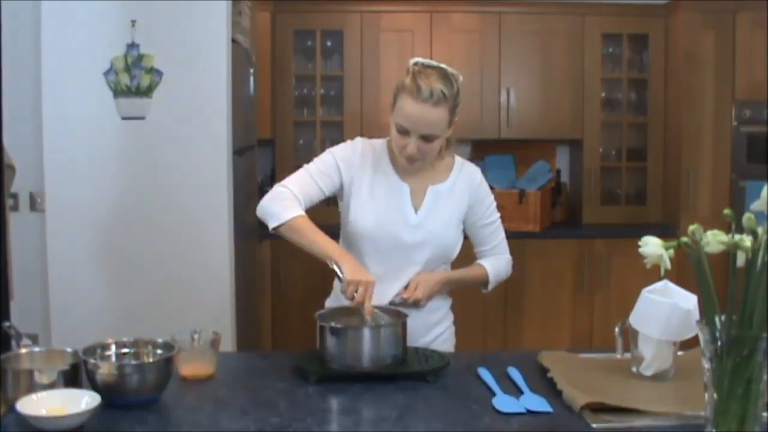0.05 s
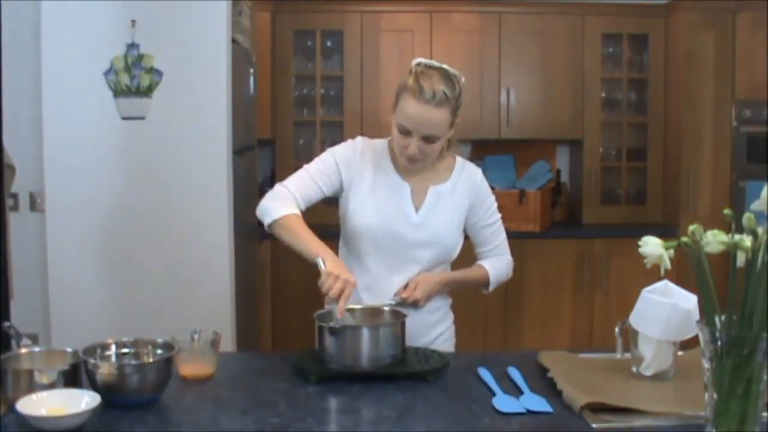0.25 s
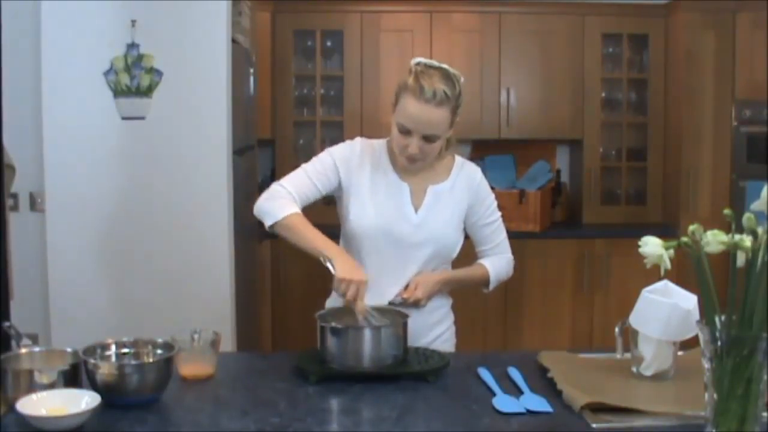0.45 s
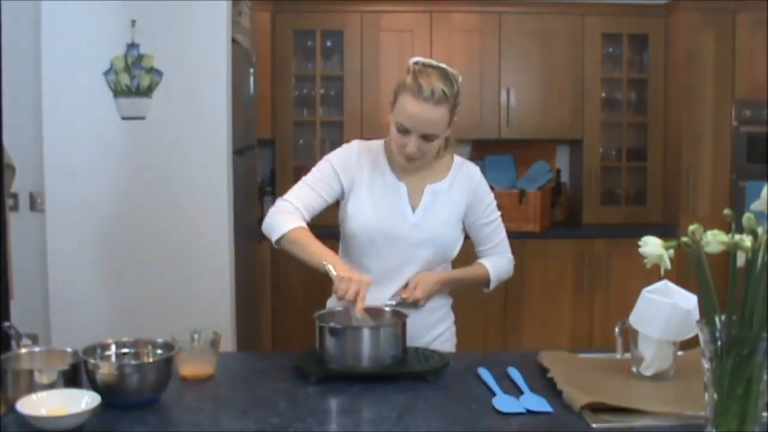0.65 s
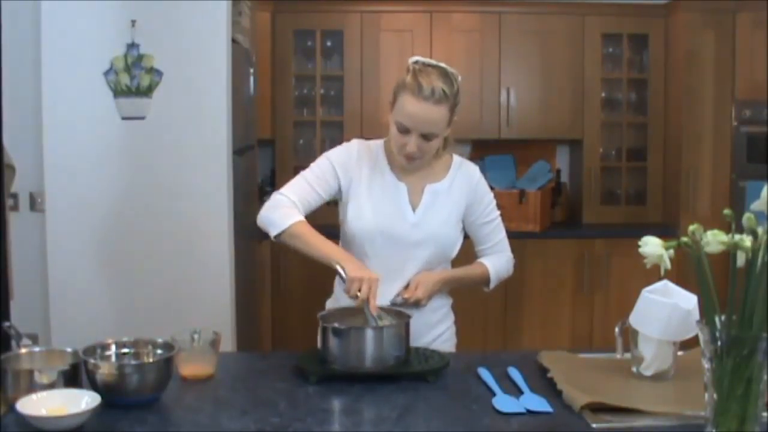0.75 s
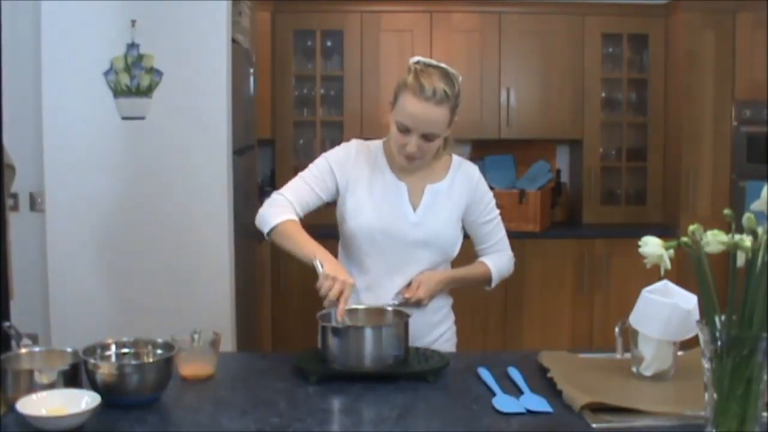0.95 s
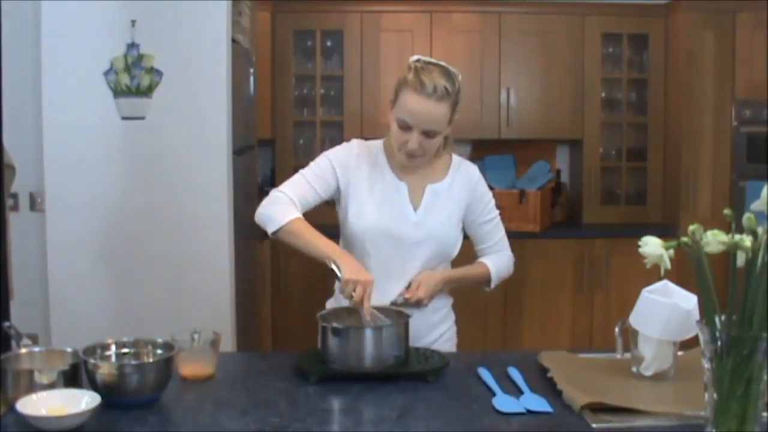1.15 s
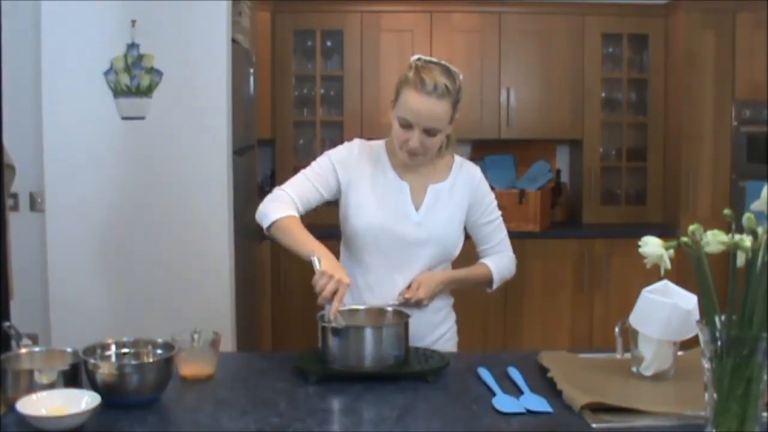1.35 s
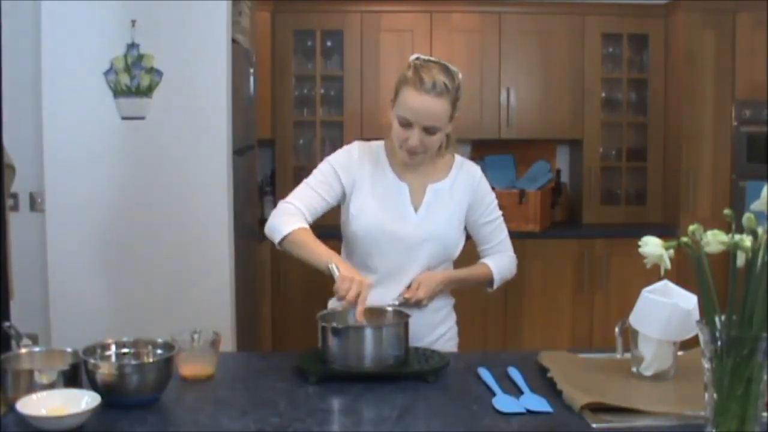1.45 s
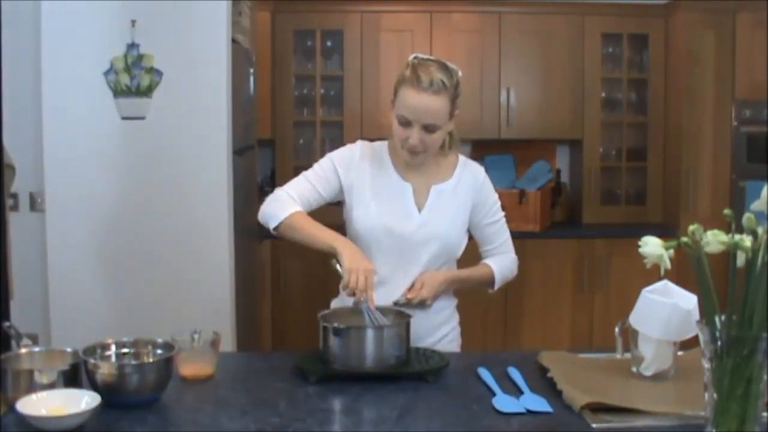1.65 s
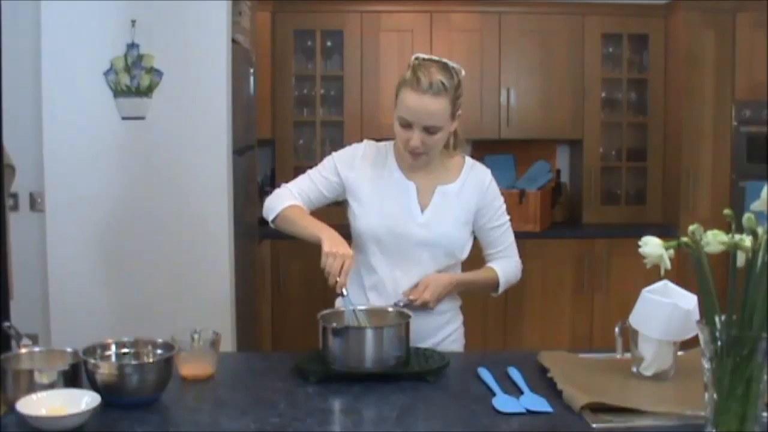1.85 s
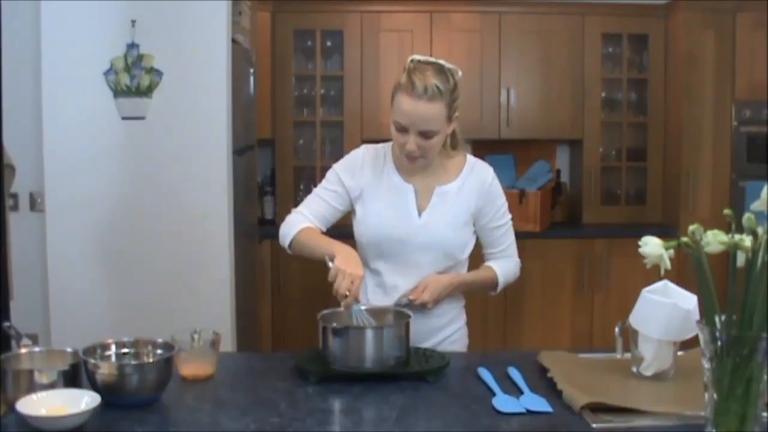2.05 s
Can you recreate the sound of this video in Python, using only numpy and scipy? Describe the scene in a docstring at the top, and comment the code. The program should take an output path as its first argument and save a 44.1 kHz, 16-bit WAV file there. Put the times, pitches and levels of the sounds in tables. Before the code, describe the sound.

A wire whisk beats thick dough in a steel saucepan. Light taps and dull knocks lead to a loud clink at 0.43 s and another at 0.57; after a gap, hits come at 0.85-1.0 and 1.2. A bright rim rattle follows near 1.35, the strongest clank at 1.55, then weaker taps and a brief scrape around 1.75. Short damped rings, roomy kitchen reflections, steady hiss and faint low hum.

```python
"""Kitchen hiss, rumble and a wavering hum; over it a wire whisk beats thick dough in a steel saucepan.
Clinks: quick volleys of wires ring the pan's damped modes, each wire adding a short noise crack.
Swishes: dense treble grains as wires run along the wall. Thuds: low noise bursts, the pan on the hob.
The hard kitchen answers with dense, banded reflections; gain control ducks after loud hits."""
import sys
import numpy as np
from scipy import signal
from scipy.fft import rfft, irfft
from scipy.io import wavfile
from scipy.ndimage import uniform_filter1d

SR = 44100
rng = np.random.default_rng(int(sys.argv[2]) if len(sys.argv) > 2 else 0)


def file_out(sig):
    """Save sig as 16-bit WAV at sys.argv[1]."""
    # one column per channel
    cols = np.atleast_2d(sig).T
    # limit, then scale
    lim = np.clip(cols, -1, 1)
    pcm = np.round(lim * 32767).astype(np.int16)
    wavfile.write(sys.argv[1], SR, pcm)


def boost(x):
    """Linear amplitude factor 10**(x/20) for a level x in decibels (scalar or array-like)."""
    u = np.asarray(x, float) / 20
    return 10 ** u


N = 92610

# kitchen background spectrum, relative: hz, level_db
AIR_SPECTRUM = [(25, -20), (45, -3), (70, -54), (110, -8.5), (180, -8), (300, -5), (450, -11.5), (900, -12),
                (1800, -17), (4000, -17.5), (6000, -27), (10000, -33.5), (15500, -35.5)]
AIR_DB, AIR_SIDE_DB = -32.5, 0.5
HUM_HZ, HUM_WIDTH_HZ, HUM_DB = 101, 36, -40   # appliance hum

# volleys of wires on the pan, relative levels:
# start_s, level_db, length_s, rim_share (0-1), tilt_below_pivot_db_per_octave, tilt_above_pivot_db_per_octave
WIRE_VOLLEYS = [(0.005, -32.5, .04, 0.77, 0.1, 10), (0.216, -10, .008, .3, -4, -9),
                (0.4, -17.5, 0.016, 0.1, 3, 6.5), (0.434, 0.5, 0.015, 0.029, 1, 3),
                (0.5715, -7.5, .006, 0.5, -1, -2), (0.855, -3.5, 0.0078, 0.2, -2.2, 3),
                (0.912, -9.5, 0.029, 0.073, -3.2, -9), (0.995, -8.5, 0.0089, 0.15, -0.5, -0.5),
                (1.198, -2, 0.011, 0.41, 0.5, -5.5), (1.273, -12.5, 0.0088, 0.51, -4.6, -8),
                (1.347, 0.5, 0.009, 0.98, 1.6, 6), (1.36, -5, .01, .7, -1.5, 6),
                (1.377, -3.5, .02, 1, 2.9, -8), (1.43, -23, 0.011, 0.74, 2, -3),
                (1.55, 3, .013, 0.65, 0.3, -1.5), (1.587, -8, 0.0089, 0.69, -4, -4),
                (1.7484, -10, 0.014, 0.25, -2, 0), (1.853, -43, 0.0082, 0.54, -4, -15)]
WIRES, VOLLEY_FALL_DB = 14, 5   # later wires land softer
WIRE_SPREAD_DB, MODE_SPREAD_DB = 2.5, 1.5
FOLLOWER_DB = -11   # mode level of all wires after the first
PIVOT_HZ, CLINK_LOW_HZ = 4910, 350

# pan modes, relative levels, t60 before the dough's limit: hz, wall_db, rim_db, t60_s
PAN_MODES = [(608, -23, -22, 0.12), (735, -18, -30, 0.11), (1145, -20.5, -10.5, 0.071),
             (1230, -15.5, -15.5, 0.04), (1986, -14, -11, 0.028), (2068, -11, 1, 0.024),
             (2314, -4, -21, 0.031), (2395, -15, -1.5, 0.017), (2810, -2, -25, 0.017),
             (2956, -22.5, -5, .11), (3750, -15, -23, 0.15), (3700, -24, -36, 0.026),
             (4000, -32, -21, 0.036), (4620, 0.5, -36, 0.028), (4680, -4, -16.5, 0.047),
             (5020, -5.5, -3, 0.02), (5650, -11, -28, 0.11), (6800, -21.5, -24, 0.06),
             (7550, -29, -31, 0.023), (9320, -18.5, -19, 0.019), (11220, -20, -64.5, 0.03)]
RING_DB = 5.5
DOUGH_CYCLES, DOUGH_T60_S = 300, 0.11   # longest t60 the dough allows, in cycles and in s

# crack of wire on steel, relative spectrum before tilt: hz, level_db
CRACK_SPECTRUM = [(150, -62), (400, -14.5), (900, -9.5), (2900, -8), (4600, 0.5), (6500, -13.5),
                  (9500, -17.5), (12000, -29.5), (15000, -58)]
CRACK_DB, CRACK_RISE_S, CRACK_T60_S = -1, 0.0004, 0.032

# wires along the wall, relative levels; length is a 20 dB fall: start_s, level_db, length_s
WALL_SWISHES = [(0.036, -37, 0.039), (0.118, -34.5, 0.044), (0.272, -33.5, 0.13), (0.741, -38, 0.099),
                (1.179, -30.5, 0.045), (1.75, -20, 0.018)]
SWISH_LOW_HZ, SWISH_TOP_HZ, SWISH_RISE_S, SWISH_GRAINS_PER_S = 6000, 12800, 0.0047, 8900

# pan knocks on the hob, relative levels; 12 dB down one width from centre: start_s, level_db, centre_hz, width_octaves
HOB_KNOCKS = [(0.198, -9, 590, 1.41), (0.215, -13.5, 185.6, 0.82), (0.228, -12.5, 604, 0.55),
              (0.263, -33, 497, 2.2), (0.323, -10, 660, 1.62), (0.371, -29, 252, 0.85),
              (0.435, -6.5, 850, 1.7), (0.51, -7, 650, 2.45), (0.58, -21, 250, 0.57),
              (0.752, -18, 1310, 0.97), (0.789, -9.5, 450, 2.3), (0.813, -32, 300, 1.8),
              (0.92, -13, 520, 2), (1.03, -17.5, 300, 3.5), (1.186, -12, 490, 2), (1.268, -12, 560, 1.8),
              (1.346, -24, 610, 1.8), (1.421, -15.5, 397, 2), (1.553, -15.5, 690, 1.4),
              (1.6, -15, 510, 1.9), (1.776, -16, 350, 1.9), (1.831, -21, 497, 1.67)]
THUD_DB, THUD_RISE_S, THUD_T60_S = 0.5, 0.0034, 0.06

# reverberation time of the kitchen: hz, t60_s
ROOM_T60_S = [(100, 0.36), (400, 0.7), (1000, 0.63), (3000, 0.56), (7000, 0.57), (14000, 0.24)]
# reflection colour, relative: hz, level_db
ROOM_COLOUR_DB = [(100, 4), (500, 0.2), (2000, -2), (5000, -4), (8000, -4.5), (15000, -8.5)]
# stereo width of the reflections; the background offsets it: hz, side_minus_mid_db
ROOM_SIDE_DB = [(60, -27.5), (180, -21), (550, -9), (1650, -7.5), (4970, -13), (15000, -22)]
ROOM_DB, ROOM_BUILD_S = 7, 0.01

# phase between two close microphone ports: hz, left_lead_rad
PORT_PHASE_RAD = [(30, -0.019), (150, -.3), (600, -0.39), (2000, -0.23), (5000, -0.19), (8000, -0.76),
                  (15000, 0.19)]
AGC_KNEE_DB, AGC_SLOPE, AGC_LAG_S, AGC_RELEASE_DB_PER_S = -16.5, 0.27, 0.042, 1
CEILING, TOP_HZ = 0.89, 15700


def at_hz(points, hz):
    """Read a table on a log-frequency axis."""
    points = np.array(points)
    return np.interp(np.log(hz + 1), np.log(points[:, 0]), points[:, 1])


def rms_one(x):
    """Scale to unit rms."""
    return x / np.sqrt(np.mean(x ** 2) + 1e-20)


def coloured(x, gain_db):
    """Filter by a gain in dB given as a function of Hz."""
    size = x.shape[-1]
    hz = np.arange(size // 2 + 1) * SR / size
    return irfft(rfft(x) * boost(gain_db(hz)), size)


def air():
    """Steady noise of set spectrum and width, plus narrow noise as a wavering hum."""
    mid, side, hum = rng.standard_normal((3, N))
    side = coloured(side, lambda hz: at_hz(ROOM_SIDE_DB, hz) + AIR_SIDE_DB)
    stereo = np.array([mid + side, mid - side])
    stereo = rms_one(coloured(stereo, lambda hz: at_hz(AIR_SPECTRUM, hz)))
    hum = coloured(hum, lambda hz: -10 * np.log10(1 + (2 * (hz - HUM_HZ) / HUM_WIDTH_HZ) ** 4))
    return boost(AIR_DB) * stereo + boost(HUM_DB) * rms_one(hum)


def ring(clicks, hz, t60_s):
    """Two-pole resonator: a unit click starts a decaying sine of initial height 1."""
    radius = boost(-60 / (max(t60_s, 0.005) * SR))
    angle = 2 * np.pi * hz / SR
    return signal.lfilter([0, np.sin(angle)], [1, -2 * radius * np.cos(angle), radius ** 2], clicks + 1e-18)


def tilt_db(row, hz):
    """Colour of one volley: two slopes meeting at the pivot."""
    octaves = np.log2((hz + 50) / PIVOT_HZ)
    return row[..., 4] * np.minimum(octaves, 0) + row[..., 5] * np.maximum(octaves, 0)


def pan_ringing(rows, starts, wires):
    """Each wire excites every mode, weighted by where it lands between low wall and rim."""
    out = np.zeros(N + SR)
    spread_db = MODE_SPREAD_DB * rng.standard_normal((len(rows), len(PAN_MODES), WIRES))
    rim = np.clip(rows[:, 3:4], 0, 1)
    follower_db = FOLLOWER_DB * (np.arange(WIRES) > 0)
    for k, (hz, wall_db, rim_db, t60_s) in enumerate(PAN_MODES):
        level_db = wall_db + rim * (rim_db - wall_db) + RING_DB
        level_db = level_db + tilt_db(rows, hz)[:, None] + follower_db + spread_db[:, k]
        clicks = np.zeros(N + SR)
        np.add.at(clicks, starts, (-1) ** k * wires * boost(level_db))
        out += ring(clicks, hz, min(t60_s, DOUGH_T60_S, DOUGH_CYCLES / hz))
    return out


def wire_cracks(rows, starts, wires):
    """Each wire gives a short broadband noise burst with its volley's tilt."""
    out = np.zeros(N + SR)
    t = np.arange(2048) / SR
    shape = boost(-60 * t / CRACK_T60_S) * (1 - np.exp(-t / CRACK_RISE_S))
    noise = rng.standard_normal((*starts.shape, len(t)))
    for row, row_starts, sizes, hiss in zip(rows, starts, wires, noise):
        hiss = rms_one(coloured(hiss, lambda hz: at_hz(CRACK_SPECTRUM, hz)))
        hiss = coloured(hiss, lambda hz: tilt_db(row, hz))
        for i, size, burst in zip(row_starts, sizes, hiss):
            out[i:i + len(t)] += boost(CRACK_DB) * size * burst * shape
    return out


def clinks():
    """Volleys of wire impacts of random sign and spacing ring the pan and crack."""
    rows = np.array(WIRE_VOLLEYS)
    # one random moment in each equal slot of the volley
    progress = (np.arange(WIRES) + rng.random((len(rows), WIRES))) / WIRES
    starts = ((rows[:, :1] + rows[:, 2:3] * progress) * SR).astype(int)
    wire_db = rows[:, 1:2] - VOLLEY_FALL_DB * progress
    wire_db = wire_db + WIRE_SPREAD_DB * rng.standard_normal(starts.shape)
    wires = boost(wire_db) * rng.choice([-1, 1], starts.shape) / np.sqrt(WIRES)
    out = pan_ringing(rows, starts, wires) + wire_cracks(rows, starts, wires)
    low_cut = signal.butter(2, CLINK_LOW_HZ, "high", fs=SR, output="sos")
    return signal.sosfilt(low_cut, out[:N])


def kitchen(x):
    """Dense reflections build up, then die band by band; mid and side tails differ."""
    t = np.arange(SR + SR // 2) / SR
    tail = np.zeros((2, len(t)))
    edges_hz = 60 * 2 ** np.arange(0, 8.6, 0.5)
    white = rng.standard_normal((2, 2, len(t)))   # neighbouring bands use different noise
    for k, (low, high) in enumerate(zip(edges_hz, np.minimum(edges_hz[1:], 19000))):
        hz = np.sqrt(low * high)
        band_pass = signal.butter(2, [low, high], "band", fs=SR, output="sos")
        band = signal.sosfilt(band_pass, white[k % 2])
        t60_s = at_hz(ROOM_T60_S, hz)
        gain_db = at_hz(ROOM_COLOUR_DB, hz) + np.array([[0], [at_hz(ROOM_SIDE_DB, hz)]])
        gain = boost(gain_db) / np.sqrt(t60_s * SR / np.log(1e6))   # offsets decay length
        tail += gain * band * boost(-60 * t / t60_s)
    tail *= 1 - np.exp(-t / ROOM_BUILD_S)
    mid, side = signal.fftconvolve(x[None], tail, axes=1)[:, :N]
    return boost(ROOM_DB) * np.array([mid + side, mid - side])


def swishes():
    """Dense random treble grains, swelling in and dying along each stroke."""
    t = np.arange(N) / SR
    strokes = np.zeros(N)
    for start_s, level_db, length_s in WALL_SWISHES:
        age_s = np.clip(t - start_s, 0, 9)
        strokes += boost(level_db - 20 * age_s / length_s) * (1 - np.exp(-age_s / SWISH_RISE_S))
    grains = rng.standard_normal(N) * (rng.random(N) < SWISH_GRAINS_PER_S / SR)
    band_pass = signal.butter(2, [SWISH_LOW_HZ, SWISH_TOP_HZ], "band", fs=SR, output="sos")
    return strokes * rms_one(signal.sosfilt(band_pass, grains))


def thuds():
    """Dull knocks: noise around a low centre, soft rise, quick fall."""
    t = np.arange(8192) / SR
    out = np.zeros(N + SR)
    shape = (1 - np.exp(-t / THUD_RISE_S)) * boost(-60 * t / THUD_T60_S)
    noises = rng.standard_normal((len(HOB_KNOCKS), len(t)))
    for (start_s, level_db, centre_hz, width_octaves), noise in zip(HOB_KNOCKS, noises):
        body = coloured(noise, lambda hz: -12 * (np.log2((hz + 1) / centre_hz) / width_octaves) ** 2)
        i = int(start_s * SR)
        out[i:i + len(t)] += boost(level_db + THUD_DB) * rms_one(body) * shape
    return out[:N]


def scene():
    """Pan sounds, direct and through the kitchen, over the background."""
    pan = clinks() + thuds() + swishes()
    return pan + kitchen(pan) + air()


def roll_off(x):
    """The treble ends steeply here."""
    return signal.sosfilt(signal.butter(12, 16370, fs=SR, output="sos"), x)


def record(dry):
    """Port phase, gain control that ducks after loud hits and recovers slowly, rounded peaks, top cut."""
    lead_rad = at_hz(PORT_PHASE_RAD, np.arange(N // 2 + 1) * SR / N)
    turn = np.exp(0.5j * lead_rad * np.array([[1], [-1]]))
    dry = irfft(rfft(dry) * turn, N)

    power = uniform_filter1d(np.mean(dry ** 2, axis=0), size=441)   # 10 ms
    level_db = 10 * np.log10(power + 1e-12)
    wanted_cut_db = AGC_SLOPE * np.maximum(level_db - AGC_KNEE_DB, 0)
    # peak hold falling at the release rate
    ramp_db = AGC_RELEASE_DB_PER_S * np.arange(N) / SR
    cut_db = np.maximum.accumulate(wanted_cut_db + ramp_db) - ramp_db
    r = np.exp(-1 / (AGC_LAG_S * SR))
    held = dry * boost(-signal.lfilter([1 - r], [1, -r], cut_db))

    rounded = CEILING * np.tanh(held / CEILING)
    top_cut = signal.butter(8, TOP_HZ, fs=SR, output="sos")
    return roll_off(signal.sosfilt(top_cut, rounded))


dry = scene()
out = record(dry)
file_out(out)
```